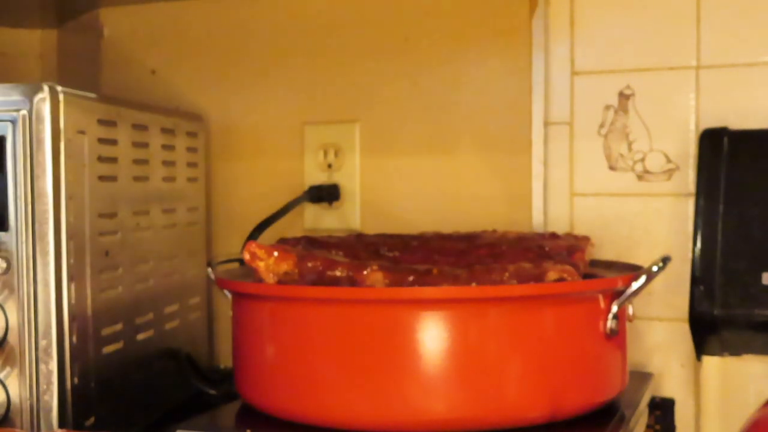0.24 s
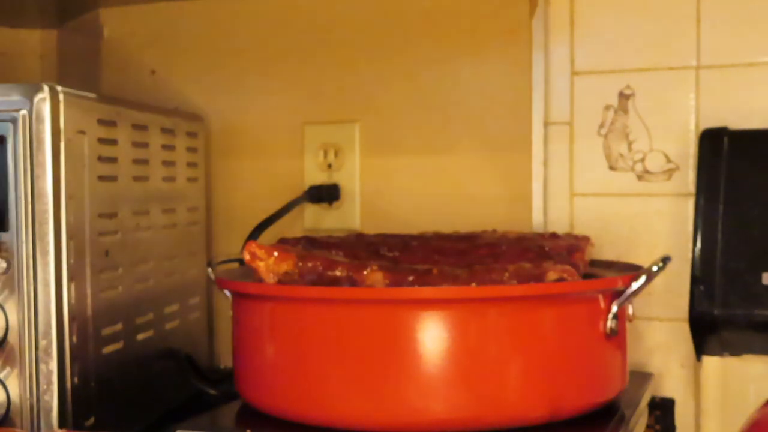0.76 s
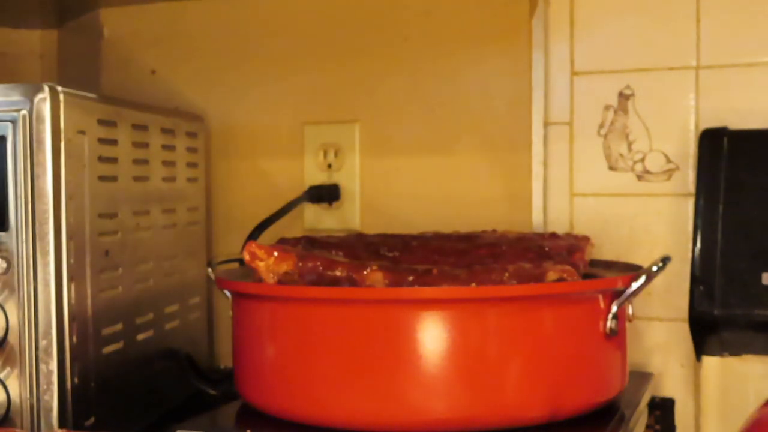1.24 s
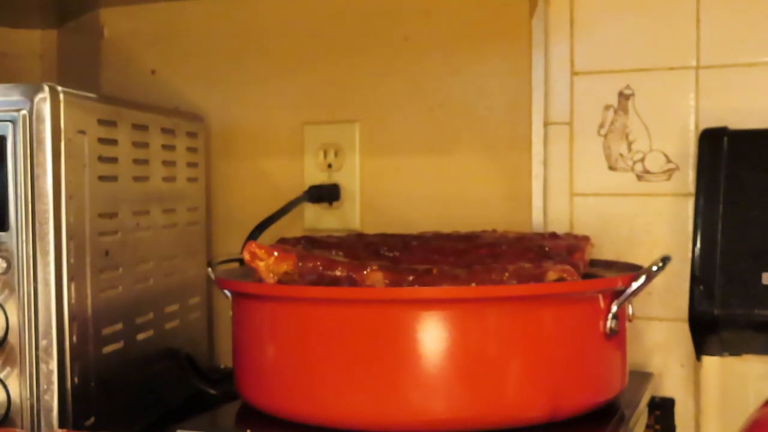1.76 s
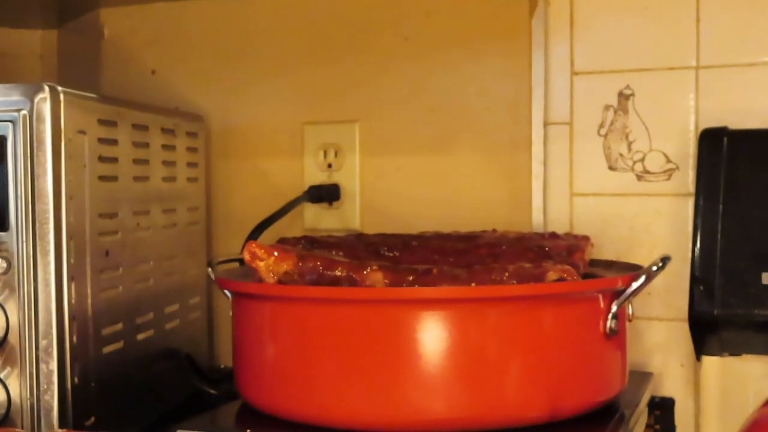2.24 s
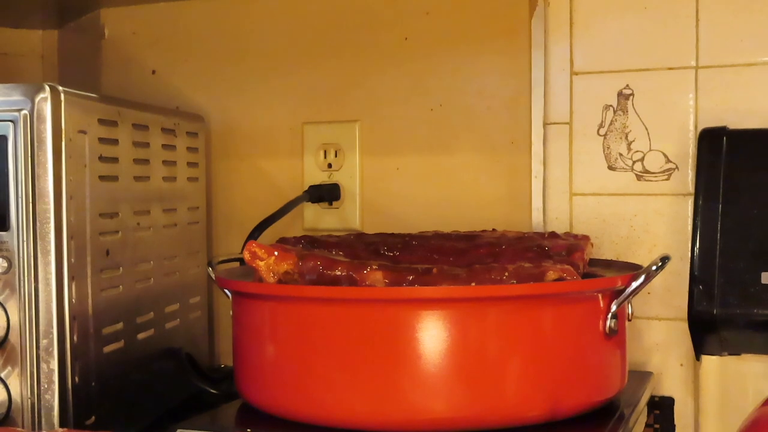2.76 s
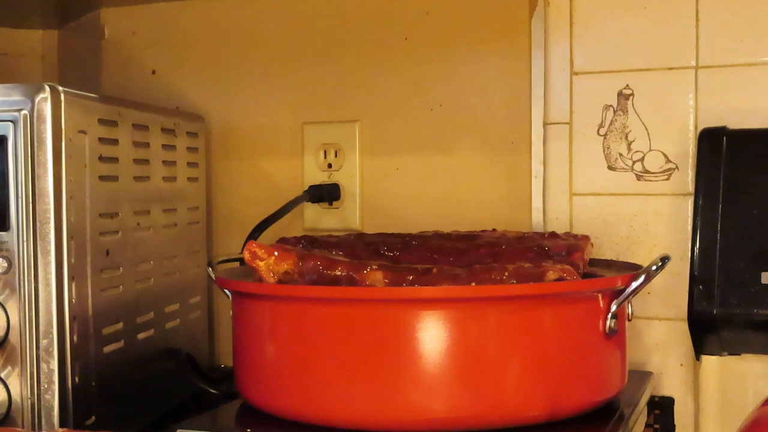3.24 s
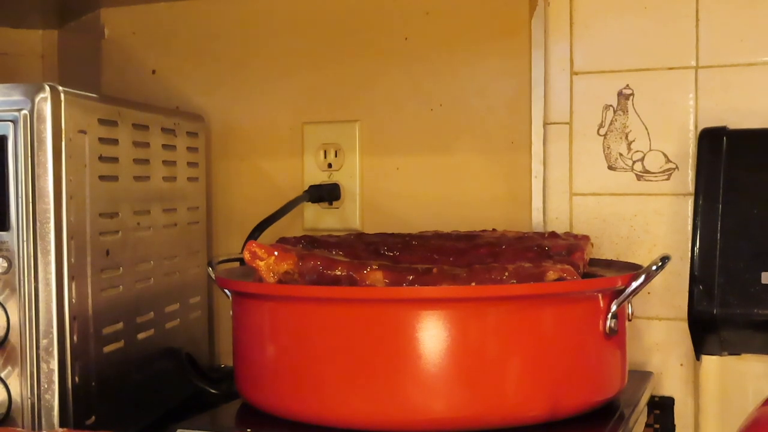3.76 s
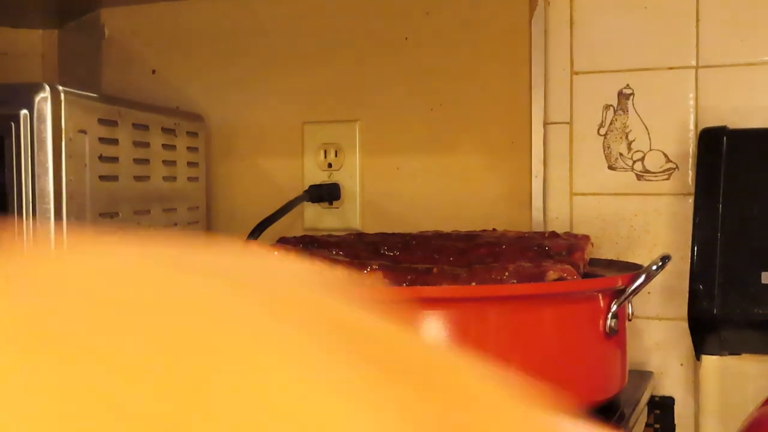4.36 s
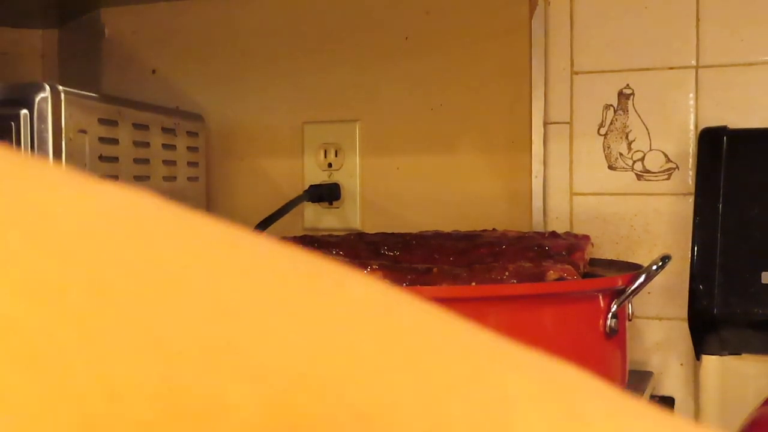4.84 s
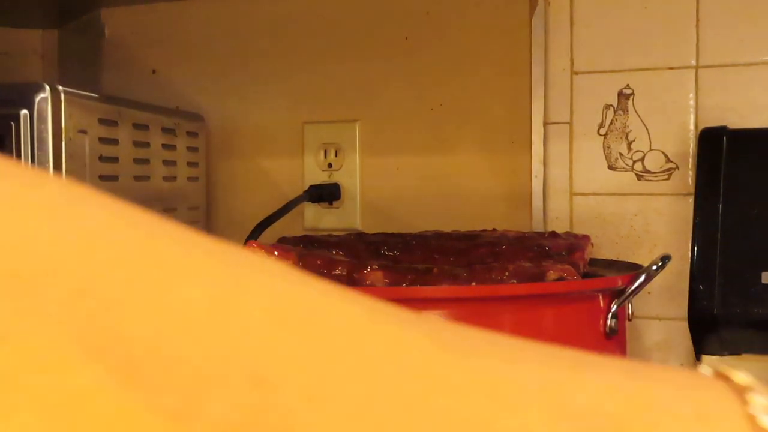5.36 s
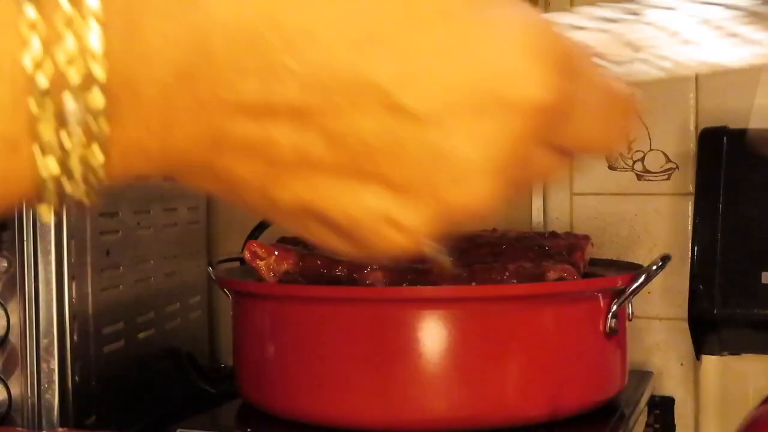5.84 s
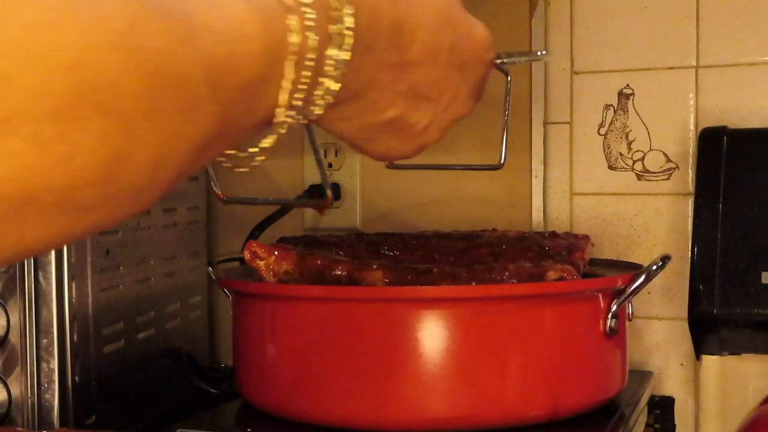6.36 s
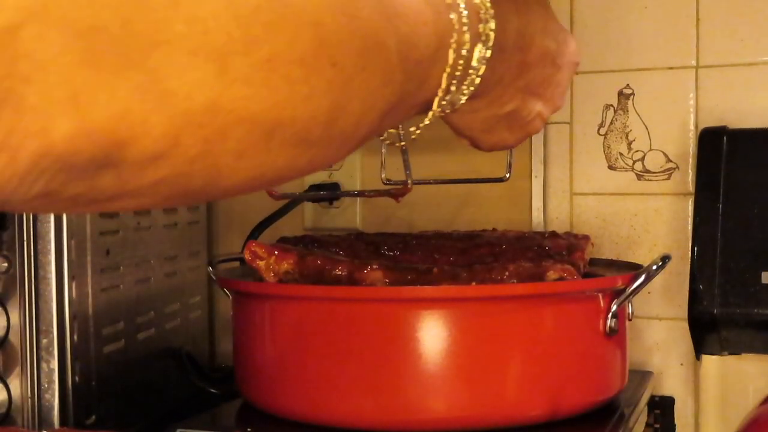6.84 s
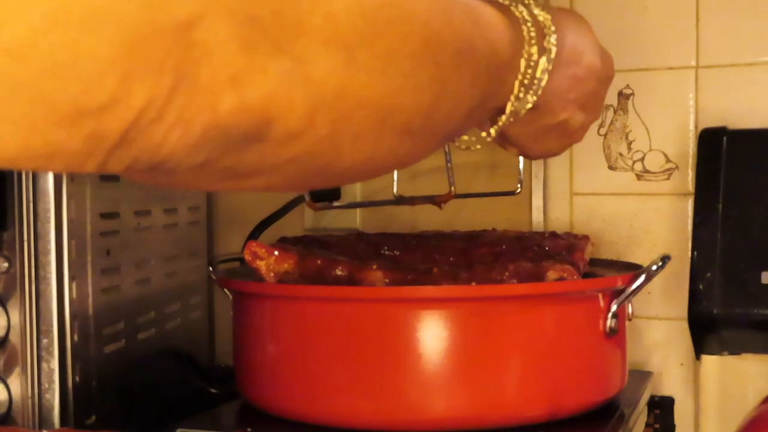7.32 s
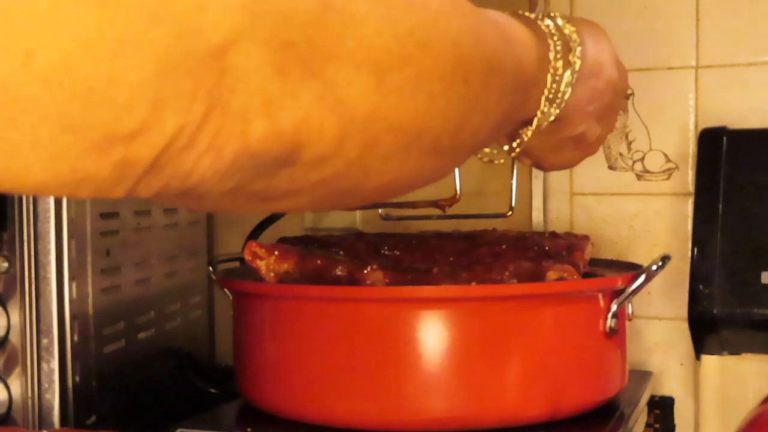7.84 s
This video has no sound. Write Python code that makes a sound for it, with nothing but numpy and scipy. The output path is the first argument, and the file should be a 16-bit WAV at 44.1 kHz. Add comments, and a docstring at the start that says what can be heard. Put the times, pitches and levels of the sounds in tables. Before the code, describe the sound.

A kitchen appliance hums and blows softly while someone moves about with muffled wooden knocks, then a metal rack clatters sharply for half a second.

```python
"""A small kitchen, heard in stereo from beside the stove: an appliance hums and blows throughout.
Someone moves about: dull knocks are short wooden rings with a low thud, rustles are swelling, grainy noise.
Then a steel wire rack is picked up and clatters against the metal under it for under a second.
Each blow is a noisy clack plus ringing modes and dense fading noise, repeated by quick small bounces."""
import sys
import numpy as np
from scipy import signal
from scipy.fft import rfft, irfft, next_fast_len
from scipy.io import wavfile
from scipy.ndimage import uniform_filter1d

SR = 44100
rng = np.random.default_rng(int(sys.argv[2]) if len(sys.argv) > 2 else 0)


def int16_out(signal):
    """Quantize to a 16-bit WAV file."""
    q = np.round(np.clip(np.atleast_2d(signal).T, -1, 1) * 32767)
    wavfile.write(sys.argv[1], SR, q.astype(np.int16))


N = 356752

# tone colour of the appliance's blowing air: (frequency [Hz], relative level [dB])
AIR_COLOUR = [(15, -16), (38, -9), (80, -1), (150, -1), (250, 0), (450, -1.5), (800, -5), (1300, -7.5),
              (1900, -11.5), (3000, -22.5), (4000, -25), (5500, -32), (7000, -34.5), (10000, -40.5),
              (14000, -45), (15500, -47)]
# steady motor tones: (frequency [Hz], level [dB])
MOTOR_TONES = [(58.5, -56.5), (182.5, -51)]
# appliance hum and duct resonances: (frequency [Hz], width [Hz], level [dB])
HUM_RESONANCES = [(58.1, 6.2, -53), (121.7, 9.2, -55.5), (180.4, 11.7, -51), (296.3, 6, -56.5),
                  (357, 62, -55.5), (725, 24, -55.5), (1197, 36, -59)]

# dull knocks on cupboard and floor:
# (time [s], wood level before tone shaping [dB], treble boost [dB], thud level [dB])
KNOCKS = [(0.955, -37, -6, -30.5), (1.036, -46.5, 10, -58), (2.167, -25.5, 2, -26.5),
          (3.315, -40.5, 6, -44), (3.390, -36, -3, -46), (4.227, -39.5, -14, -40), (4.261, -32.5, -12, -50)]
# dull wooden crack of a knock: (frequency [Hz], relative level [dB])
WOOD_COLOUR = [(30, -5), (190, 0.5), (320, 0.5), (460, 0.5), (570, 0.5), (1300, -1), (2080, -3.5),
               (2700, -17), (4200, -22.5), (7000, -46), (14000, -60)]
# what the cupboard rings with: (frequency [Hz], relative level [dB], time to fade by 60 dB [s])
WOOD_MODES = [(189, 4.5, 0.11), (464, 4, 0.12), (820, -5, 0.098), (1400, -13, .16), (1670, -3.5, 0.23),
              (2140, -16, 0.23), (2200, -28, 0.21)]
# low thud of floor and counter: (frequency [Hz], relative level [dB], time to fade by 60 dB [s])
THUD_MODES = [(34, -7, .38), (80, -1.5, .28), (103, -9, .3)]

# rustles of clothing: (time of the height [s], level before swell, grain and tone shaping [dB],
# swell and fade time [s], treble boost [dB])
RUSTLES = [(1.23, -53.5, .09, 3.5), (1.357, -40, 0.05, 0), (1.945, -49, .03, -4), (4.325, -46, 0.049, -3.5),
           (4.48, -48, 0.097, -5)]
# tone colour of rubbing cloth: (frequency [Hz], relative level [dB])
CLOTH_COLOUR = [(300, -26), (900, 0), (1450, 3), (2200, 0), (3000, -7.5), (4200, -5), (5500, -15.5),
                (7000, -16), (10000, -22.5), (12500, -25), (15500, -36)]

# blows on the rack: (time [s], level relative to other blows before tone shaping [dB],
# bass boost [dB], hard metal treble boost [dB], register that the struck spot favours [Hz])
BLOWS = [(4.770, -22, 4.5, -25, 540), (4.814, -14, 6, 0, 900), (4.9253, -11.5, -8, -1.5, 2480),
         (4.938, -15, 2.5, -12, 1680), (5.011, -16.5, -0.5, -18, 1610), (5.080, -10, 1, -16, 1060),
         (5.101, -10.5, -4, 0, 1530), (5.118, -12.5, 1, -9, 2020), (5.178, -10, -3, -17, 790),
         (5.196, -11, -6, -10, 1150), (5.213, -11, -11.5, -17, 1080), (5.309, -15.5, 3, 6, 830),
         (5.328, -15, -12, -6.5, 1720)]
# what the rack's frame rings with: (frequency [Hz], relative level [dB], time to fade by 60 dB [s])
FRAME_MODES = [(218.6, 1, 0.21), (296.4, 2, 0.3), (440, 2, 0.21), (480, 0.5, 0.21), (681, 4, 0.26),
               (744, 1.5, 0.17), (809, 4.5, 0.25), (886, 2.5, 0.25), (983, -4, 0.17), (1086, 4.5, 0.22),
               (1186, 3, 0.24), (1233, 0.5, 0.18), (1495, 2.5, 0.21), (1572, 3, 0.25), (1600, 8, 0.12),
               (1680, -1, 0.17), (1882, 1, 0.21), (2113, 4, 0.18), (2150, 4, 0.1), (2470, -14, .3),
               (2920, -14, 0.28), (3820, -16, 0.3), (4020, -17, 0.2), (4460, -13, 0.29)]
# the many overlapping wire modes and the kitchen's echo: (frequency [Hz], relative level [dB])
CLANG_COLOUR = [(30, -25), (110, -10), (200, -5), (600, 5), (1500, 1.5), (2250, 1), (3100, -13.5),
                (4000, -12.5), (5300, -20), (6500, -13), (7800, -22), (10300, -13), (11000, -18.5),
                (13800, -22), (15500, -38)]
# how long that wash rings: (frequency [Hz], time to fade by 60 dB [s])
CLANG_FADE = [(150, 0.73), (600, 0.2), (2000, 0.22), (5000, 0.26), (12000, 0.065)]

# stereo width of the hits, narrow in the bass, wide in the treble:
# (frequency [Hz], side level minus middle level [dB])
HIT_WIDTH = [(40, -42), (130, -51), (700, -22), (1400, -25), (2000, -25), (2700, -8), (4000, -10.5),
             (5400, -4), (8000, -3.5), (10500, -0.5), (14000, 6)]
# stereo width of the air and cloth, narrower in the bass, wide in the treble:
# (frequency [Hz], side level minus middle level [dB])
SOFT_WIDTH = [(45, -32), (100, -16), (200, -12), (400, -11), (750, -13.5), (1300, -16.5), (1900, -16),
              (2700, -7), (5400, -4.5), (14000, 0)]

RING = int(.7 * SR)  # longest ring or rub, in samples
RUSTLE_LEAD_S = .25  # each rub starts this long before its height
TOP_HZ = 15500  # the treble is cut above this

# light rattle of loose wires while the rack is moving; levels relative to the blows
RATTLE_FROM_S, RATTLE_TO_S = 4.96, 5.29
RATTLE_DB, RATTLE_SCATTER_DB = -24.5, 2
RATTLE_BASS_DB, RATTLE_EDGE_DB, RATTLE_HZ = -5, -6.5, 4200


def undb(db):
    """Turn decibels into a plain multiplier."""
    return 10 ** (np.asarray(db) / 20)


def at_hz(points, hz):
    """Read a curve of (frequency, value) points, spacing frequencies by pitch."""
    point_hz, value = np.transpose(points)
    return np.interp(np.log(np.maximum(hz, 1)), np.log(point_hz), value)


def colour(x, points):
    """Filter x to the gains of (Hz, dB) points without any sound starting early."""
    size = next_fast_len(x.shape[-1] // 2 + 2048, True) * 2
    gain = undb(at_hz(points, np.fft.rfftfreq(size, 1 / SR)))
    # folding the log gain's transform makes the filter answer only after its input
    cepstrum = irfft(np.log(gain))
    cepstrum[1:size // 2] *= 2
    cepstrum[size // 2 + 1:] = 0
    response = np.exp(rfft(cepstrum))
    return irfft(rfft(x, size) * response)[..., :x.shape[-1]]


def unit(x, count=None):
    """Scale to an average strength (rms) of 1 over the first count samples."""
    return x / np.sqrt(np.mean(x[..., :count] ** 2, axis=-1, keepdims=True))


def add(out, s, x):
    """Mix x into out from time s."""
    i = max(int(s * SR), 0)
    out[:, i:i + x.shape[-1]] += x[:, :N - i]


def stereo(pair, width_db, pan_db=0):
    """Two unrelated signals become left and right: more alike in the bass, wide in the treble."""
    mid, side = pair[0], colour(pair[1], width_db)
    left = (mid + side) * undb(pan_db / 2)
    right = (mid - side) * undb(-pan_db / 2)
    return np.array([left, right])


def contact(x, edge_db, edge_from_hz=2700, edge_full_hz=8000, bass_db=0):
    """A heavy contact brings out the low body, a hard one the treble."""
    edge_from_hz = max(edge_from_hz, 1201)
    return colour(x, [(70, 0), (300, bass_db), (1200, 0), (edge_from_hz, 0), (edge_full_hz, edge_db)])


def wash(spectrum, t60s):
    """Ringing modes too dense to tell apart: noise whose bands each die at their own pace."""
    t, f = np.arange(RING) / SR, np.fft.rfftfreq(RING, 1 / SR)
    noise = rfft(rng.standard_normal((2, RING)))
    centres = np.array(t60s)[:, 0]
    out = 0
    # each share is 1 at its own band and 0 at the others, so neighbours crossfade
    for (_, t60), share in zip(t60s, np.eye(len(t60s))):
        band = at_hz(np.c_[centres, share], f)
        fade = np.exp(-np.log(1000) * t / t60)
        out = out + irfft(noise * band, RING) * fade
    return unit(colour(out, spectrum), count=1000)


def ringing(hz, t60):
    """One dying vibration for each mode, losing 60 dB in t60 seconds."""
    turn_and_fade = 2j * np.pi * hz - np.log(1000) / t60
    return np.exp(np.outer(turn_and_fade, np.arange(RING) / SR)).astype(np.complex64)


def strike(rings, db, scatter_db):
    """Set modes going over a millisecond of contact; their strengths depend on where the thing is hit."""
    shape = (2, len(rings))
    gain = undb(db + scatter_db * rng.standard_normal(shape))
    gain = gain * np.exp(2j * np.pi * rng.random(shape))
    push = np.sin(np.pi / 2 * np.minimum(np.arange(RING) / (.001 * SR), 1)) ** 2
    return unit(push * (gain.astype(np.complex64) @ rings).imag, count=1000)


def chatter(length_s, bounce_db, count=4):
    """A blow and the quick uneven bounces that follow it, weaker as they go."""
    force = np.zeros(RING)
    force[0] = 1
    when = (np.arange(count) + rng.random(count)) / count
    place = (1 + when * length_s * SR).astype(int)
    force[place] += undb(bounce_db) * (1 - when / 2) * rng.choice([-1, 1], count)
    return force / np.linalg.norm(force)


def bounced(x, length_s, bounce_db):
    """Repeat a ring with every bounce of its blow."""
    return signal.fftconvolve(x, chatter(length_s, bounce_db)[None], axes=1)[:, :RING]


def appliance(air_db=-41.24, waver_db=0.57):
    """Gently wavering fan noise with steady motor tones and noise narrowed by hum and duct resonances."""
    f, t = np.fft.rfftfreq(N, 1 / SR), np.arange(N) / SR
    # keeping only the slowest few hertz of noise makes a slow waver
    waver = unit(irfft(rfft(rng.standard_normal(N)) * np.exp(-f / 4), N))
    air = unit(colour(rng.standard_normal((2, N)), AIR_COLOUR))
    air = undb(air_db + waver_db * waver) * air
    hum = np.zeros(N)
    for hz, db in MOTOR_TONES:
        hum += undb(db) * unit(np.sin(2 * np.pi * (hz * t + rng.random())))
    for hz, width, db in HUM_RESONANCES:
        resonance = 1 / (1 + (2 * (f - hz) / width) ** 2)
        hum += undb(db) * unit(irfft(rfft(rng.standard_normal(N)) * resonance, N))
    return stereo(air, SOFT_WIDTH, pan_db=-0.14) + hum


def knocks(room_db=-10, ring_db=-3, bass_db=2.5, settle_s=.012, bounce_db=-11.5):
    """Short wooden knocks that settle in a few bounces, with a low thud and a little of the room."""
    out = np.zeros((2, N))
    hz, mode_db, t60 = np.transpose(WOOD_MODES)
    panel = ringing(hz, t60)
    thud_hz, thud_mode_db, thud_t60 = np.transpose(THUD_MODES)
    thud = undb(thud_mode_db) @ ringing(thud_hz, thud_t60).imag
    for s, db, edge_db, thud_db in KNOCKS:
        wood = wash(WOOD_COLOUR, [(200, 0.11), (3000, 0.17)])  # (Hz, s to fade by 60 dB)
        wood += undb(ring_db) * strike(panel, mode_db, scatter_db=2.0)
        wood += undb(room_db) * wash(WOOD_COLOUR, CLANG_FADE)
        wood = unit(bounced(wood, settle_s, bounce_db), count=1000)
        wood = contact(wood, edge_db, edge_from_hz=1300, edge_full_hz=4500, bass_db=bass_db)
        add(out, s, undb(db) * wood + undb(thud_db) * thud)
    return stereo(out, HIT_WIDTH, pan_db=-0.6)


def rustles(grain_db=2):
    """Soft rubbing noise that swells and fades, grainy from catching fibres."""
    out = np.zeros((2, N))
    lag = np.arange(RING) / SR - RUSTLE_LEAD_S
    for s, db, swell_s, edge_db in RUSTLES:
        swell = np.exp(-(lag / swell_s) ** 2)
        # smoothed noise moves the level up and down from moment to moment
        grain = undb(grain_db * unit(uniform_filter1d(rng.standard_normal(RING), size=150)))
        rub = unit(colour(rng.standard_normal((2, RING)), CLOTH_COLOUR))
        add(out, s - RUSTLE_LEAD_S, undb(db) * swell * grain * contact(rub, edge_db))
    return stereo(out, SOFT_WIDTH)


def rattle(count=6):
    """Light contacts of loose wires at uneven moments, as rows like those of the blows."""
    when, strength = rng.random((count, 2)).T
    times = RATTLE_FROM_S + (RATTLE_TO_S - RATTLE_FROM_S) * (np.arange(count) + when) / count
    levels = RATTLE_DB + RATTLE_SCATTER_DB * (2 * strength - 1)
    return [(s, db, RATTLE_BASS_DB, RATTLE_EDGE_DB, RATTLE_HZ) for s, db in zip(times, levels)]


def rack(ring_db=-3.0, jingle_db=-13, jingle_t60=0.18, bounce_db=-8, tick_db=8.5, tick_s=0.0018,
         tick_edge_db=-14, spot_db=3.5, spread_s=0.0019, count=220):
    """Each blow clacks, bounces and sets the frame, the thin wires and the room ringing."""
    out, t = np.zeros((2, N)), np.arange(RING) / SR
    hz, mode_db, t60 = np.transpose(FRAME_MODES)
    frame = ringing(hz, t60)
    wire_hz = 2600 + 11800 * (np.arange(count) + rng.random(count)) / count
    wires = ringing(wire_hz, jingle_t60)
    # the wash and jingle build up over a few milliseconds as the blow spreads through the wires
    spread = 1 - np.exp(-t / spread_s)
    for s, db, bass_db, edge_db, spot_hz in BLOWS + rattle():
        tick = unit(colour(rng.standard_normal((2, RING)), CLANG_COLOUR)) * np.exp(-t / tick_s)
        jingle = strike(wires, at_hz(CLANG_COLOUR, wire_hz), scatter_db=0.0)
        body = spread * (wash(CLANG_COLOUR, CLANG_FADE) + undb(jingle_db) * jingle)
        body += undb(ring_db) * strike(frame, mode_db, scatter_db=1.5)
        body += undb(tick_db) * contact(tick, tick_edge_db)
        # the struck spot favours sound within half an octave of its register
        body = colour(body, [(spot_hz / np.sqrt(2), 0), (spot_hz, spot_db), (spot_hz * np.sqrt(2), 0)])
        # a firm blow bounces briefly (8 ms at -10 dB); the time doubles for every 10 dB lighter
        chatter_s = .008 * 2 ** ((-10 - db) / 10)
        struck = unit(bounced(body, chatter_s, bounce_db), count=2000)
        struck = contact(struck, edge_db, edge_from_hz=3770, edge_full_hz=8000, bass_db=bass_db)
        add(out, s, undb(db) * struck)
    return undb(-3.5) * stereo(out, HIT_WIDTH, pan_db=-1.2)


def scene():
    """The kitchen: appliance, knocks, rustles and rack together."""
    return appliance() + knocks() + rustles() + rack()


def record(dry):
    """Round off peaks near full scale, then cut the top of the treble steeply."""
    rounded = dry / (1 + dry ** 6) ** (1 / 6)
    treble_cut = signal.ellip(10, .2, 80, TOP_HZ, fs=SR, output="sos")
    return signal.sosfilt(treble_cut, rounded)


dry = scene()
out = record(dry)
int16_out(out)
```